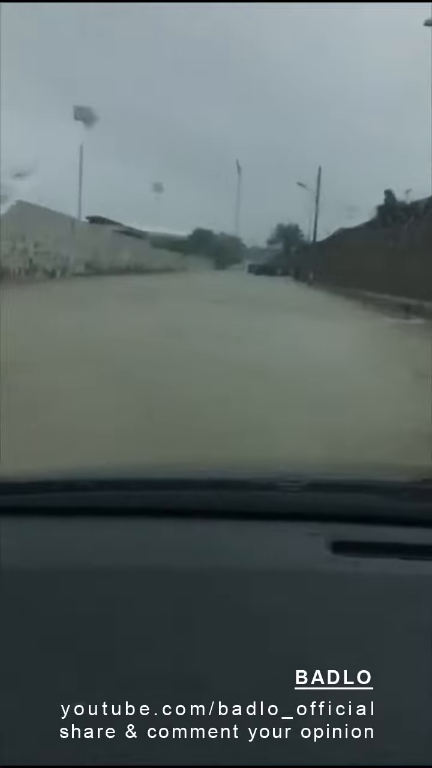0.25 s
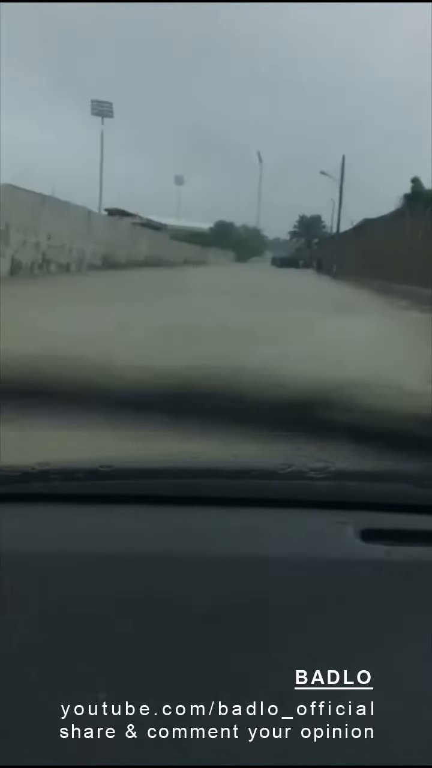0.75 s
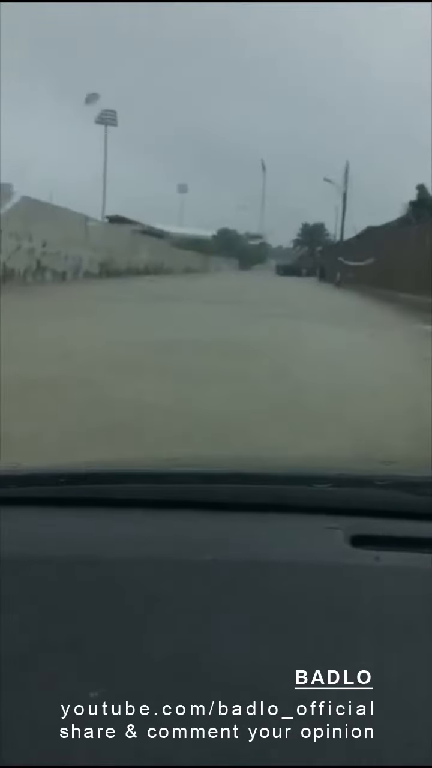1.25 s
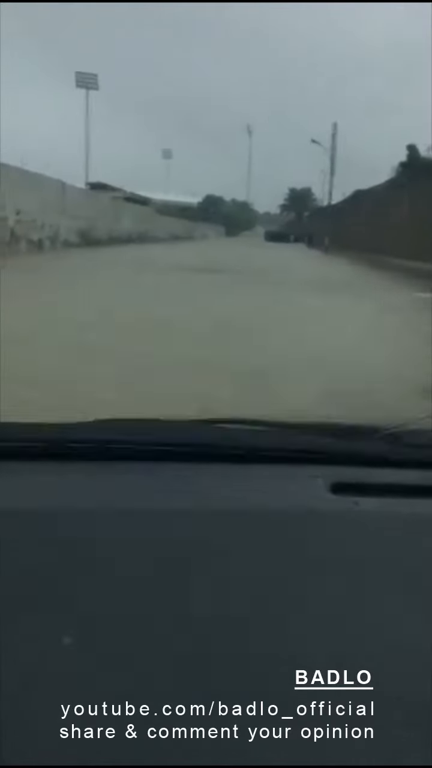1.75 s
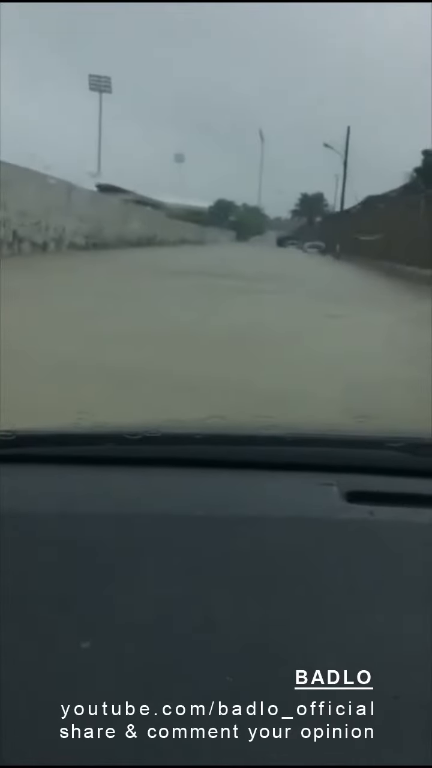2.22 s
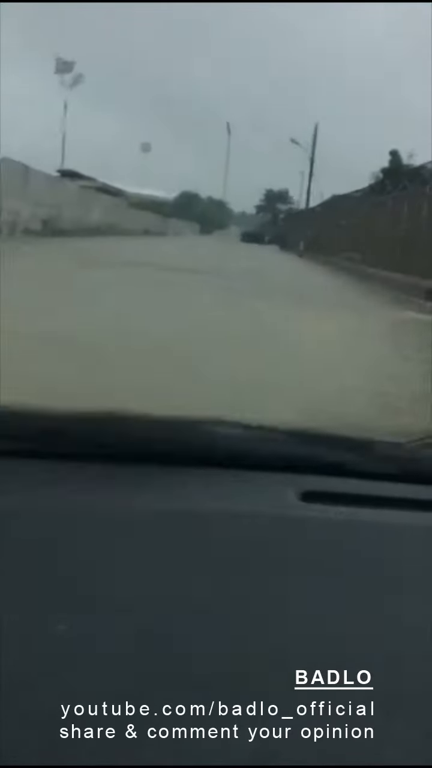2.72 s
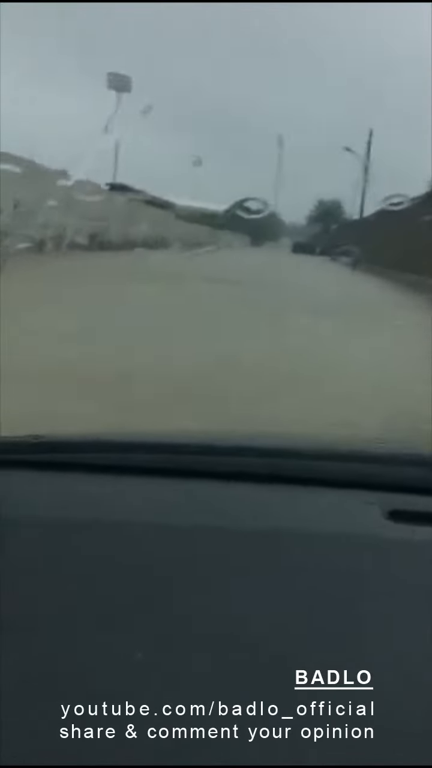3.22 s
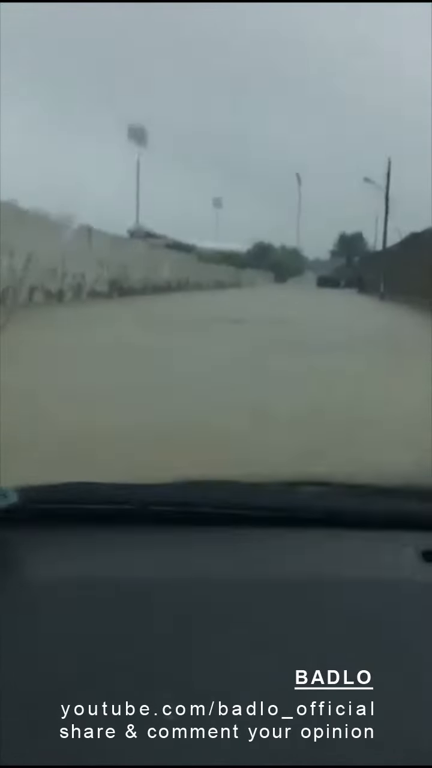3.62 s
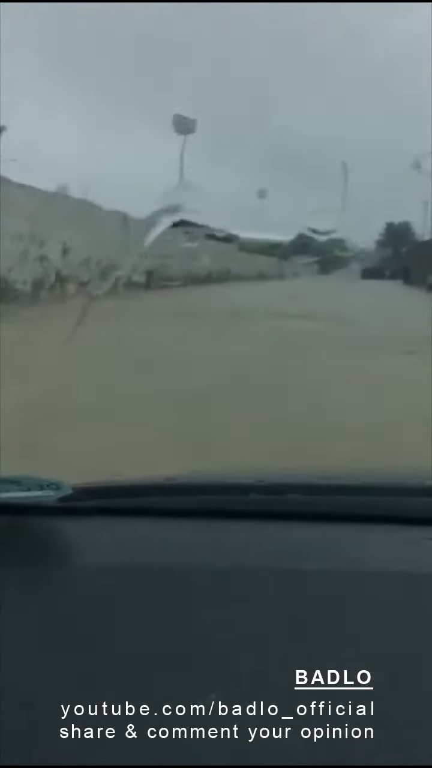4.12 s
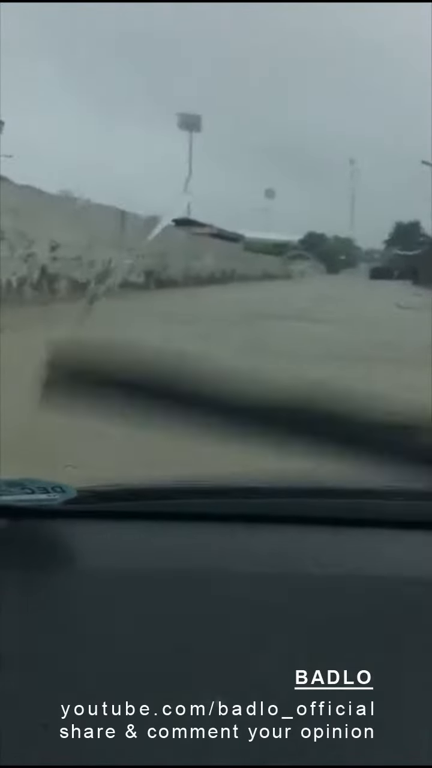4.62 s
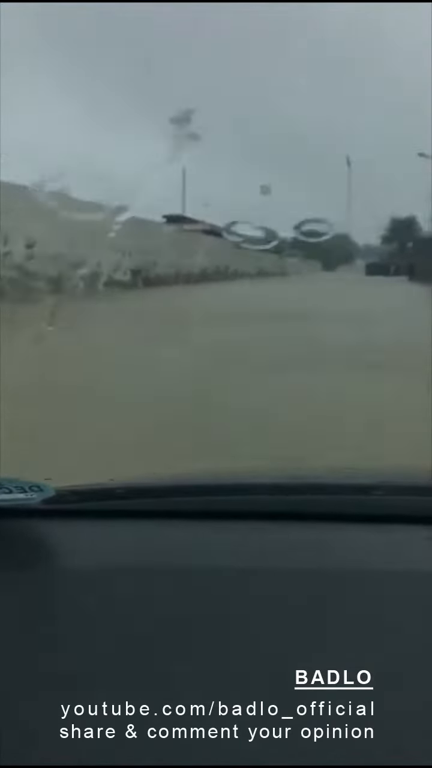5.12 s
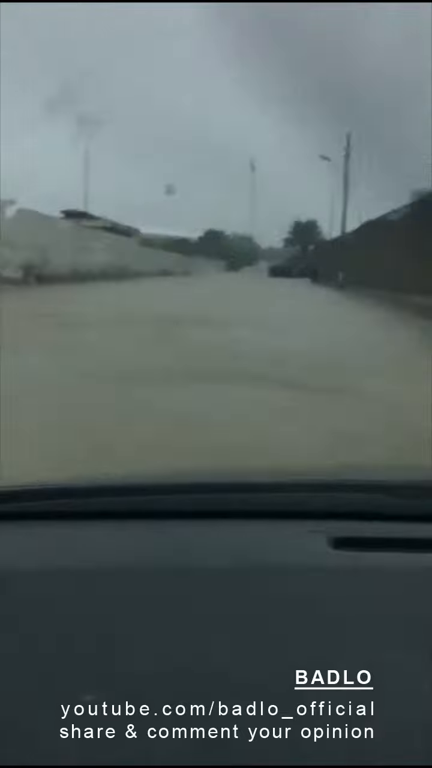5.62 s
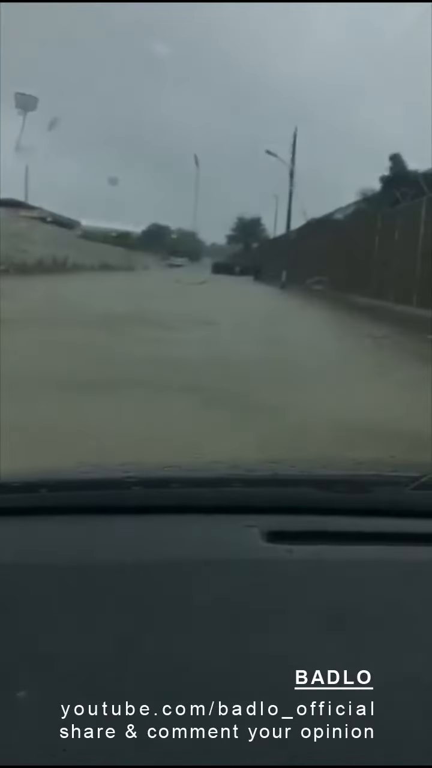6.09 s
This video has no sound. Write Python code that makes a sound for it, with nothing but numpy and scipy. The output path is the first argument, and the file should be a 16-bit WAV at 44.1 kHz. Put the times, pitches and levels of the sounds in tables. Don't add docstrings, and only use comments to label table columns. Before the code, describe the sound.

Muffled car cabin in rain, a labouring engine throbbing deeply while water sloshes and slaps underneath and wiper rubber squeaks about once a second.

```python
import sys
import numpy as np
from scipy import signal
from scipy.io import wavfile
from scipy.ndimage import uniform_filter1d

SR = 44100
rng = np.random.default_rng(int(sys.argv[2]) if len(sys.argv) > 2 else 0)


def attenuation_scalar(level_db):
    decades = np.asarray(level_db, float) / 20
    return 10 ** decades


def digitize_waveform(pressure):
    field = np.atleast_2d(pressure).T
    bounded = np.clip(field, -1, 1)
    quanta = np.round(bounded * 32767).astype(np.int16)
    wavfile.write(sys.argv[1], SR, quanta)


N = 280035


def evened(x):
    return x / np.sqrt(np.mean(x ** 2) + 1e-20)


def add(mix, s, sound):
    part = mix[max(round(s * SR), 0):][:len(sound)]
    part += sound[:len(part)]


def lobe(hz, length_s, phase, power):
    t = np.arange(0, length_s, 1 / SR)
    return np.sin(2 * np.pi * hz * t + phase) * np.sin(np.pi * t / length_s) ** power


def resonate(x, hz, width_hz):
    turn = np.exp(2j * np.pi * np.cumsum(hz * np.ones(len(x))) / SR)
    pole = np.exp(-np.pi * width_hz / SR)
    smooth = signal.lfilter([1 - pole], [1, -pole], x / turn)
    return 2 * (turn * smooth).real


def drift(smooth_s):
    span = int(smooth_s * SR)
    once = uniform_filter1d(rng.standard_normal(N), span)
    return evened(uniform_filter1d(once, span))


def wash(spectrum, size, patchy_db, flicker_db):
    frames, hz = 4 * N // size + 9, np.fft.rfftfreq(size, 1 / SR)
    real, imaginary, patches = rng.standard_normal((frames, len(hz), 3)).T
    patches = uniform_filter1d(patches, size=10, axis=0)
    patches = evened(uniform_filter1d(patches, size=8, axis=1))
    flicker = evened(uniform_filter1d(rng.standard_normal(frames), size=4))
    f, db = np.transpose(spectrum)
    colour_db = np.interp(np.log(hz + 1), np.log(f + 1), db, left=-120, right=-120)
    gain = attenuation_scalar(colour_db[:, None] + patchy_db * patches + flicker_db * flicker)
    noise = signal.istft((real + 1j * imaginary) * gain, nperseg=size, noverlap=3 * size // 4)[1]
    return evened(noise[size:N + size])


# time_s, pressure_db
FLOW = [(0, -41), (.15, -45), (.45, -45.5), (.6, -42), (1.3, -44.5), (1.47, -41), (1.65, -45), (2.2, -43),
        (2.55, -46.5), (3.5, -43), (3.7, -41), (4.1, -43), (4.6, -40.5), (4.95, -43), (5.15, -41),
        (5.9, -41.5), (6.08, -39.5), (6.35, -41)]


def pressed(rest_db, share, chance_db, span_s):
    time_s, pressure_db = np.transpose(FLOW)
    flow_db = np.interp(np.arange(N) / SR, time_s, pressure_db)
    return attenuation_scalar(rest_db + share * (flow_db - flow_db.mean()) + chance_db * drift(span_s))


# middle_s, rise_db, length_s
HEAVES = [(.05, 7.5, .14), (.3, 5, 0.27), (0.851, 8, 0.21), (1.03, 4, .12), (1.533, 8.5, 0.3),
          (1.744, 4.5, .15), (1.981, 4, .25), (2.348, 4.5, .14), (2.468, 2, 0.087), (2.762, 4, 0.17),
          (3.252, 6.5, .25), (3.43, 5.5, 0.18), (3.73, 6, 0.11), (4.25, 3, .3), (4.66, 1, .12),
          (5.25, 5.5, .15), (5.599, 5.5, 0.35)]


def heaving():
    up_db = np.zeros(N + SR)
    for s, db, length in HEAVES:
        add(up_db, 1 + s - length / 2, db * np.hanning(int(length * SR)))
    return attenuation_scalar(up_db[SR:])


# frequency_hz, level_db
RUMBLE = [(18, -36), (27, -20), (33, -5), (48, -8.5), (62, -2.5), (80, -2), (100, -7), (125, -25)]


def rumble():
    gain = pressed(rest_db=-31, share=0, chance_db=1.5, span_s=.1) * heaving()
    return gain * wash(RUMBLE, size=8192, patchy_db=.36, flicker_db=.3)


# frequency_hz, level_db
DRUMMING = [(75, -21), (100, 2.5), (125, -0.5), (150, -3.5), (185, -1.5), (215, -6.5), (260, -16.5),
            (300, -19), (390, -42.5)]


def drumming():
    gain = pressed(rest_db=-32.5, share=.5, chance_db=.27, span_s=.1)
    return gain * wash(DRUMMING, size=4096, patchy_db=.5, flicker_db=1.23)


# frequency_hz, level_db
SURGE = [(130, -28.5), (220, -3.5), (329, -7.5), (386, -6), (464, -12), (586, -9), (746, -16), (1150, -20),
         (1500, -30), (1950, -51.5), (3300, -120)]


def surge():
    gain = pressed(rest_db=-41, share=.9, chance_db=.88, span_s=.04)
    return gain * wash(SURGE, size=2048, patchy_db=.54, flicker_db=0)


# frequency_hz, level_db
FIZZ = [(650, -28.5), (1100, -5), (1550, -5), (2000, -3), (2500, -6.5), (2850, -9.5), (3200, -8),
        (4300, -12), (4650, -14), (4950, -18.5), (5400, -16), (6300, -18.5), (7700, -26.5), (8300, -40)]


def fizz():
    gain = pressed(rest_db=-50, share=.14, chance_db=.5, span_s=.16)
    return gain * wash(FIZZ, size=512, patchy_db=.8, flicker_db=.79)


# frequency_hz, level_db
MISTY = [(4500, -33.5), (5500, -3.5), (6500, -1), (7700, 2.5), (8200, -11), (8800, -47.5)]


def mist():
    gain = pressed(rest_db=-73, share=.5, chance_db=2.5, span_s=.2)
    return gain * wash(MISTY, size=512, patchy_db=3, flicker_db=-.5)


def bubbles(db, per_s, low_hz, high_hz):
    born = rng.random(N) < per_s / SR
    size = attenuation_scalar(3.5 * np.minimum(rng.exponential(1, N), 2.5)) * born
    kind, out = rng.integers(0, 16, N), np.zeros(N)
    for k, hz in enumerate(np.geomspace(low_hz, high_hz, num=16)):
        turns = np.arange(5000) / SR * hz
        envelope = turns * np.exp(-turns / 5) / np.sqrt(hz)
        ring = np.sin(2 * np.pi * turns * (1 + .002 * turns)) * envelope
        out += signal.oaconvolve(size * (kind == k), ring)[:N]
    return attenuation_scalar(db) * evened(out)


def water():
    small = bubbles(db=-57.5, per_s=250, low_hz=1001, high_hz=6000)
    gurgles = bubbles(db=-51, per_s=60, low_hz=239.2, high_hz=696)
    return rumble() + drumming() + surge() + fizz() + mist() + small + gurgles


# start_s, level_db, bright_edge_db
SPLASHES = [(0.14, -46, -58), (0.57, -39, -54), (0.6567, -31.5, -47.5), (0.6744, -33.5, -45),
            (0.699, -35.5, -52), (0.7693, -41.5, -54.5), (0.949, -38, -57), (0.9982, -35.5, -63),
            (1.39, -42.5, -55.5), (1.4426, -38.5, -62), (1.6546, -33.5, -60), (1.7065, -37.5, -66),
            (1.9, -40, -58), (1.928, -37.5, -55), (2.2436, -38, -62), (2.489, -36.5, -46.5),
            (3.0705, -38.5, -55), (3.4173, -37.5, -60), (3.492, -37, -52.5), (3.64, -42, -52.5),
            (3.7, -37, -50), (3.78, -39.5, -54), (4.0886, -39.5, -56.5), (4.62, -38.5, -60),
            (4.72, -39.5, -59), (5.0657, -42.5, -64.5), (6.06, -36, -58)]
# frequency_hz, level_db
SPRAY = [(2500, -38), (4000, -5), (6500, 0.5), (8000, -6), (9000, -15.5), (10000, -43)]


def splashes():
    puffs, edges, t = np.zeros(N), np.zeros(N), np.arange(6000) / SR
    t60_s, rise_s = .055, .0015
    fade = attenuation_scalar(-60 * t / t60_s) * (1 - np.exp(-t / rise_s))
    for s, db, bright_db in SPLASHES:
        add(puffs, s, attenuation_scalar(db - 6.5) * fade)
        add(edges, s, attenuation_scalar(bright_db - 5.5) * fade)
    dull = wash(FIZZ, size=512, patchy_db=1.5, flicker_db=.3)
    bright = wash(SPRAY, size=512, patchy_db=1.5, flicker_db=.3)
    return puffs * dull + edges * bright


# start_s, level_db, pitch_hz
DROPS = [
    (0.6589, -28, 1790),
    (0.6894, -34, 2120),
    (0.7422, -37, 1460),
    (1.4142, -32, 2070),
    (6.1459, -35, 1876),
]


def drops():
    out, t = np.zeros(N), np.arange(6000) / SR
    t60_s, rise_s = .04, .0015
    soft = 1 - np.exp(-t / rise_s)
    for s, db, hz in DROPS:
        add(out, s - .002, attenuation_scalar(db - 4 - 60 * t / t60_s) * soft * np.sin(2 * np.pi * hz * t))
    return out


# start_s, level_db
TICKS = [(0.6578, -33.5), (.677, -34), (.951, -33.5), (.999, -33), (1.657, -33.5), (1.93, -34),
         (2.4902, -28), (2.494, -40.5), (3.27, -37), (3.756, -34.5), (4.067, -34), (5.497, -37)]


def ticks():
    out, u = np.zeros(N), np.arange(60) / SR / .00004
    for s, db in TICKS:
        add(out, s, attenuation_scalar(db) * (1 - u) * np.exp(-u))
    return out


# middle_s, level_db, pitch_hz
THUDS = [(0.084, -24, 172.5), (0.58, -30.5, 286), (0.684, -24.5, 174.7), (1.469, -26.5, 177.4),
         (1.609, -27, 206), (1.42, -26.5, 170), (1.55, -26, 105), (5.601, -28, 199.5), (5.266, -26, 138.3),
         (1.9164, -22.5, 184.4), (2.843, -24, 180), (2.842, -22.5, 109), (3.671, -25, 186),
         (4.207, -24.5, 124), (0.16, -25.5, 115), (4.05, -23.5, 122), (5.75, -24, 119), (4.56, -25.5, 110),
         (4.587, -31, 280), (4.673, -21, 170), (4.724, -23, 130), (4.826, -22, 121), (5.263, -25, 187),
         (6.017, -21.5, 127), (6.043, -24.5, 175), (6.12, -28.5, 178), (6.321, -30, 183), (6.336, -25, 121)]


def slaps():
    out, slap_s = np.zeros(N), .065
    for s, db, hz in THUDS:
        add(out, s - slap_s / 2, attenuation_scalar(db) * lobe(hz, slap_s, 0, 2.8))
    return out


# pitch_factor, width_hz, level_db
BLADE = [(1, 95, 0), (1.25, 150, -8), (.76, 130, -8), (.45, 90, -5)]


def squeak(db, middle_hz, length_s):
    judder = rng.standard_normal(8000)[:int(length_s * SR)]
    hz = middle_hz * (1 + .12 * np.linspace(-.5, .5, len(judder)))
    ring = np.zeros(len(judder))
    for factor, width, mode_db in BLADE:
        narrow = resonate(judder, factor * hz, width)
        ring += attenuation_scalar(mode_db) * resonate(narrow, factor * hz, 2 * width)
    return attenuation_scalar(db) * evened(ring) * np.hanning(len(ring))


def slip(length_s, phases):
    return sum(attenuation_scalar(mode_db) * lobe(hz, 1.15 * length_s, np.pi * phase, 2.5) for hz, mode_db, phase in phases)


# low_turn_lateness_s, squeak_db, pitch_hz, thud_db, high_turn_squeak_db
SWEEPS = [
    (.012, -41.5, 890, -22, -47.5),
    (0, -40, 830, -20, -45.5),
    (-.012, -38.5, 830, -15.5, -54),
    (.013, -39.5, 860, -23, -60),
    (-.003, -40, 810, -19, -60.5),
    (0, -37, 800, -23, -47),
    (0, -40.5, 900, -18, -49.5),
]
# offset_s, level_over_squeak_db, length_s
SLIP_RULE = [
    (-.022, 2, .014),
    (.002, 4.5, .012),
    (.022, 0, .015),
]


def wipers():
    sweep_s, first_turn_s, top_after_s = .9175, .008, .56
    flip_s, top_flip_s, top_hz = .09, .05, 875
    thud_after_s, thud_hz, thud_s = .025, 126, .075
    out = np.zeros(N + SR)
    chance = rng.uniform(-1.002, 1, (len(SWEEPS), len(SLIP_RULE), 5))
    for count, (late_s, db, hz, thud_db, top_db) in enumerate(SWEEPS):
        s = 1 + first_turn_s + count * sweep_s + late_s
        add(out, s - flip_s / 2, squeak(db, hz, flip_s))
        add(out, s + top_after_s - top_flip_s / 2, squeak(top_db, top_hz, top_flip_s))
        add(out, s + thud_after_s - thud_s / 2, attenuation_scalar(thud_db) * lobe(thud_hz, thud_s, 0, 2.8))
        for (offset, over_db, length), (late, loud, *phase) in zip(SLIP_RULE, chance[count]):
            modes = [(k * hz, mode_db, p) for (k, _, mode_db), p in zip(BLADE, phase)]
            slip_s = s + offset + .005 * late - .58 * length
            slip_db = db + over_db + 2.5 * loud - 3
            add(out, slip_s, attenuation_scalar(slip_db) * slip(length, modes))
    return out[SR:]


FIRING_HZ = 48.45
# middle_s, level_db, length_s
BOOM = [(0.049, -14.5, 0.139), (0.27, -13.5, .17), (0.374, -17, .15), (0.579, -16.5, .14),
        (0.749, -18, .13), (0.923, -19, .18), (1.2, -17.5, .2), (1.663, -18, .21), (1.87, -22, .14),
        (2.12, -24.5, .3), (2.399, -19.5, .15), (2.611, -21, .18), (2.766, -15, .1), (3.027, -19.5, 0.221),
        (3.252, -21.5, .09), (3.39, -17.5, .2), (3.68, -18, .16), (3.879, -16, .22), (4.039, -18.5, .16),
        (4.169, -15.5, .17), (4.289, -17, .13), (4.47, -17, .22), (4.749, -16.5, .2), (4.901, -18, .12),
        (5.119, -18.5, .15), (5.269, -14, .2), (5.597, -15.5, .43), (5.859, -16, .2), (6.041, -15, .15),
        (6.215, -12, .28)]


def boom():
    lead, chance = SR // 2, rng.random((len(BOOM), 2))
    swells = np.zeros(N + lead)
    for (s, db, length), (phase, off) in zip(BOOM, chance):
        hz = FIRING_HZ * (1 + .049 * (2 * off - 1))
        add(swells, s + .5 - length / 2, attenuation_scalar(db - 1.1) * lobe(hz, length, 2 * np.pi * phase, 1))
    hum_db, width_hz = -33, 10.1
    hum = resonate(rng.standard_normal(N), FIRING_HZ, width_hz)
    hum = resonate(hum, FIRING_HZ, 2 * width_hz)
    return swells[lead:] + attenuation_scalar(hum_db) * evened(hum)


# firing_rate_multiple, level_db
ORDERS_DB = [(1.5, -34.5), (2, -41), (2.5, -46)]


def orders():
    steady = 2 * np.pi * FIRING_HZ * np.arange(N) / SR
    out = np.zeros(N)
    for multiple, db in ORDERS_DB:
        out += attenuation_scalar(db + 3.1 * drift(.028)) * np.sin(multiple * steady + 1.5 * drift(.11))
    return out


def engine():
    return boom() + orders()


def scene():
    fade_out_s = .012
    ending = np.minimum((N - np.arange(N)) / (fade_out_s * SR), 1)
    weather = splashes() + drops() + ticks()
    return ((water() + weather + slaps() + wipers() + engine()) * ending)[None]


def roll_off(x):
    return signal.sosfilt(signal.butter(12, 8260, fs=SR, output="sos"), x)


def record(dry):
    ceiling = .36
    limited = ceiling * np.tanh(dry / ceiling)
    return roll_off(limited)


dry = scene()
out = record(dry)
digitize_waveform(out)
```